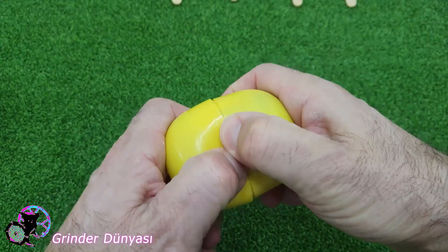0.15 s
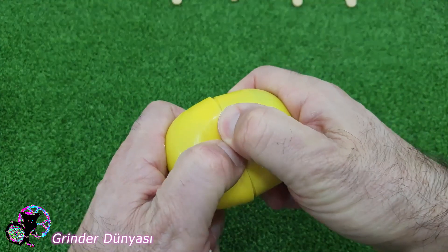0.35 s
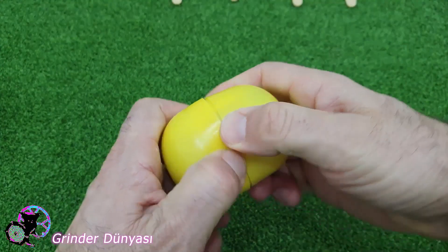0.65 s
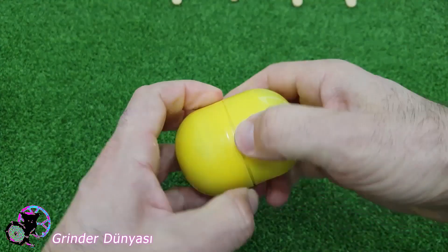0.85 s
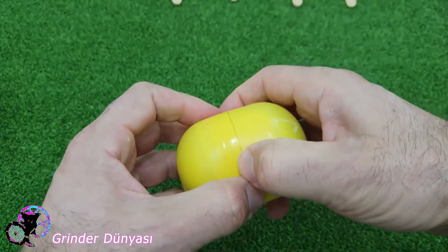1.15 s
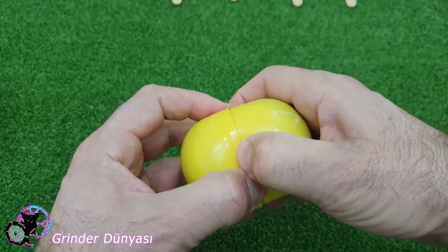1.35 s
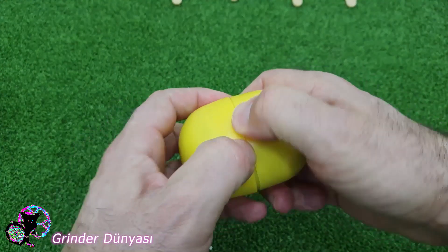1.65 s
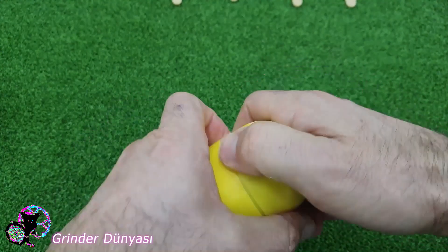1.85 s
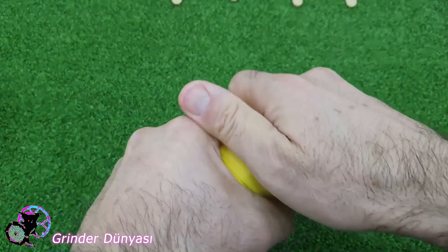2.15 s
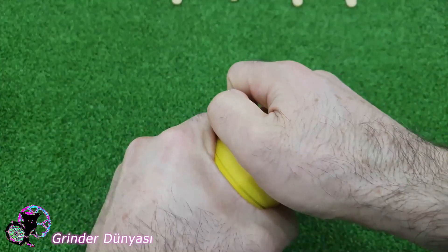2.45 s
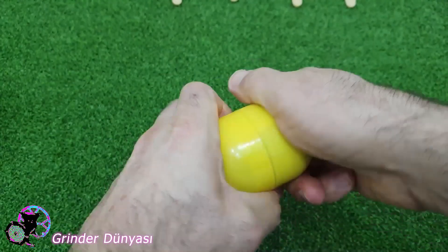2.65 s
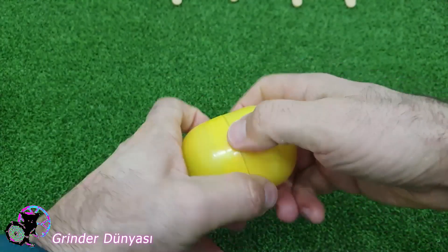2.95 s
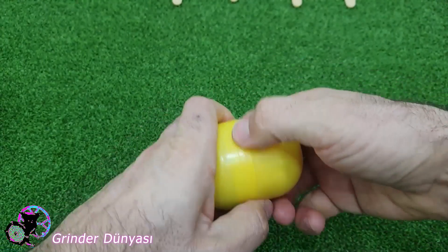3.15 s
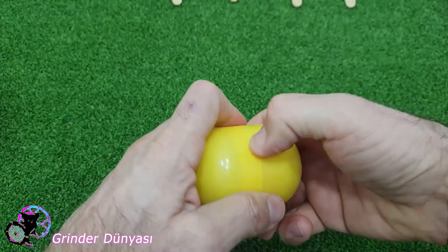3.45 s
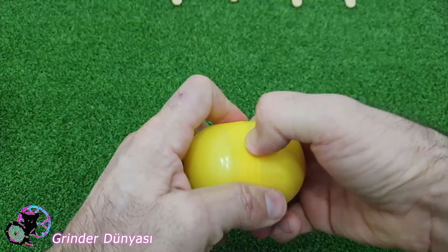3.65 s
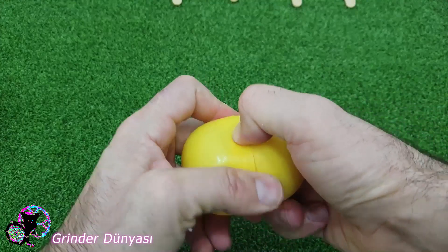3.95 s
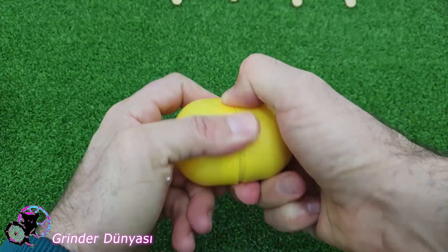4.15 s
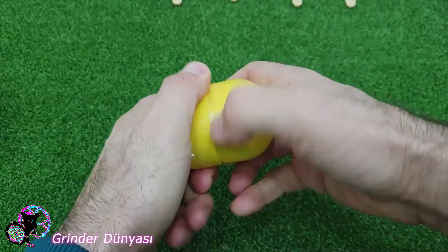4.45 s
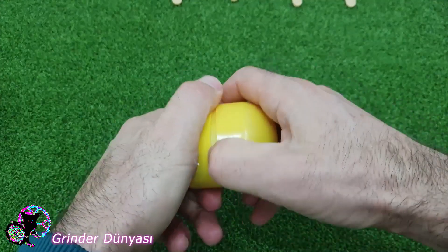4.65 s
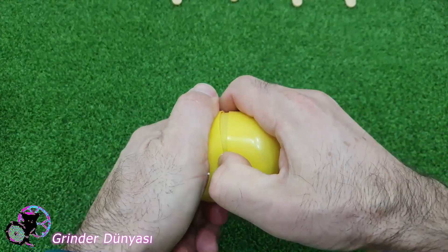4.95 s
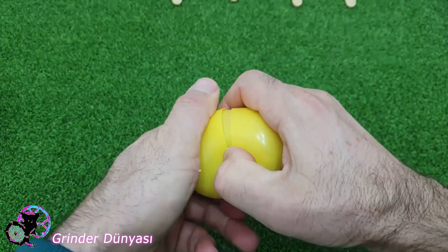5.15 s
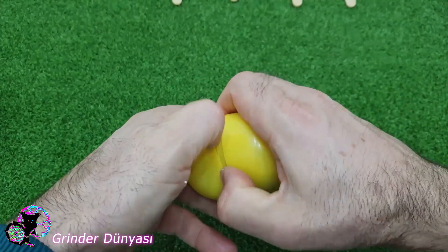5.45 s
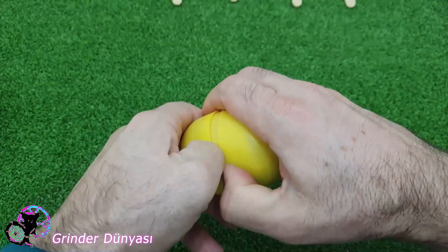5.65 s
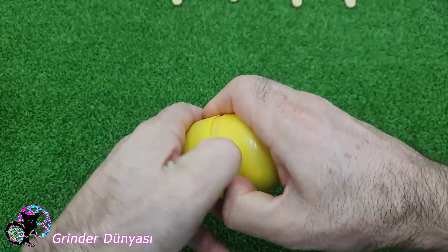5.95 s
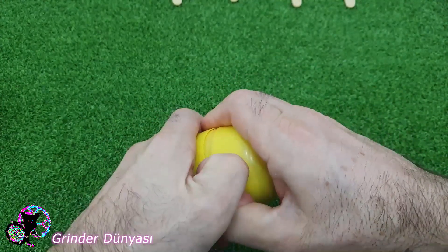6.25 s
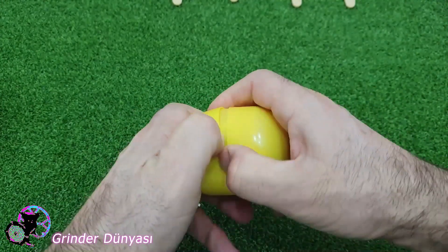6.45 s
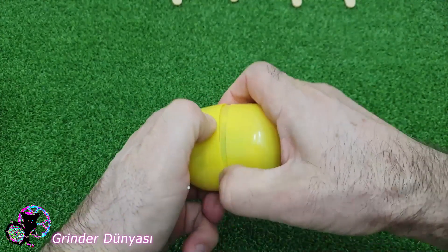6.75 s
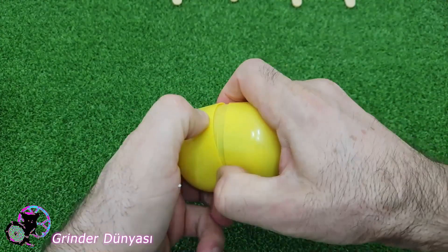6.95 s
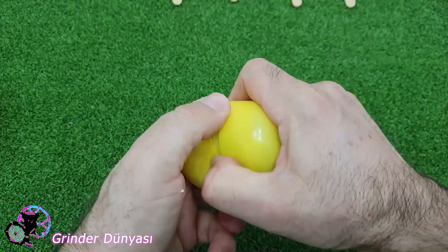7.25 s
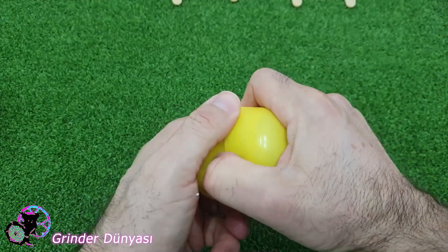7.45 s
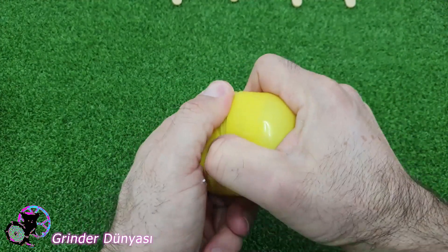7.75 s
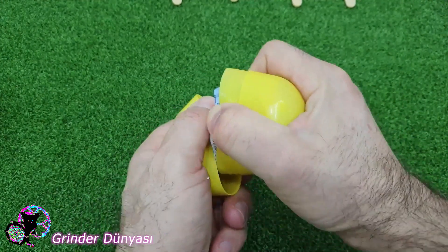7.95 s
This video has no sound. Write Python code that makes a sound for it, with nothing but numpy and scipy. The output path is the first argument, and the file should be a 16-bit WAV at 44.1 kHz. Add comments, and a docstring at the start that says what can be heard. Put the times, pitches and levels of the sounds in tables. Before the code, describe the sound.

Close to two hands in a hard-walled room, skin rubs and squeaks on a hollow plastic capsule while its seam ticks. After a few seconds of fading handling, a single huge pop overloads the microphone and echoes briefly. Quiet fumbling follows, then a crack with a rough rim scrape, a lull, firmer rubbing, and a snapping slide as the halves part.

```python
"""A hard-walled room, heard close to two hands that squeeze and twist a hollow plastic toy capsule.
Skin rubs on the shell as fluttering noise through the wall and the hollow between the hands; cracks and ticks
of rim and seam are bursts into resonances; one loud pop drives the wall's modes and the room; the rim scrapes
over its ridge, husky notes glide, soft thuds are decaying sines, and at last the halves slip apart.
A quiet room tone lies beneath. The loudest cracks overload the microphone."""
import sys
import numpy as np
from scipy import signal
from scipy.fft import rfft, irfft, next_fast_len
from scipy.io import wavfile
from scipy.ndimage import map_coordinates

SR = 44100
rng = np.random.default_rng(int(sys.argv[2]) if len(sys.argv) > 2 else 0)


def transcribe(signal):
    """Save signal, clipped to [-1, 1], as a 16-bit WAV file at the path in sys.argv[1]."""
    frames = np.atleast_2d(signal).T
    limited = np.clip(frames, -1, 1)
    pcm = np.round(limited * 32767).astype(np.int16)
    wavfile.write(sys.argv[1], SR, pcm)


N = 356328

# the wall buckling: (time [s], level [dB])
POP = (3.2019, 5.5)
# resonances of the buckling wall: (frequency [Hz], width [Hz], level [dB])
POP_MODES = [(370, 200, -3), (680, 270, -5), (1395, 360, 6.5), (1800, 300, 6), (2600, 700, -2),
             (4100, 2400, -14)]
# colour of the pop as it spreads through the room: (frequency [Hz], level [dB per Hz])
POP_SPREAD = [(50, -23), (100, -11), (180, -5), (330, -2.5), (600, -0.5), (900, -7), (1300, -6), (1700, -6),
              (2400, -11), (4200, -11), (5500, -21.5), (9000, -25), (15000, -26.5)]
# cracks of the rim and seam, loud and faint: (time [s], level [dB], ring [Hz], crack over ring [dB],
# knock over ring [dB], crack centre [Hz], left over right [dB])
CRACKS = [(0.654, -25.5, 3130, 0.5, -15.5, 2340, 1), (0.8097, -13.5, 676, -5, -2, 3100, 1),
          (4.4964, -43.5, 7700, 12.5, -14, 5150, -16.5), (4.87, -30, 1780, -0.5, -5.5, 4400, -2.5),
          (4.8867, -24.5, 6430, -2.5, -10, 3930, -1), (4.982, -34, 1890, 1.5, 1.5, 3420, -1),
          (5.5847, -16.5, 1730, 4.5, -13, 3700, -2), (5.5944, -29, 1470, -4, 0.5, 3760, 0),
          (5.6209, -13.5, 1843, 9, -6, 6000, -2.5), (7.9042, -16.5, 640, -0.5, -28, 3640, 0),
          (7.9115, -6.5, 1700, -1, -8, 5200, 0), (8.0383, -27, 1710, 9, -2, 6440, 1)]
# small ticks of the seam: (time [s], level [dB], ring [Hz], crack over ring [dB])
TICKS = [(0.0106, -32.5, 2690, -8), (0.2127, -39.5, 1700, 2), (0.2253, -31, 1800, -2),
         (0.24, -32.5, 1640, -0.5), (0.3427, -32.5, 1660, -1), (0.6785, -29.5, 1500, -2),
         (0.7999, -24, 1040, -1), (0.8373, -23.5, 646, -7), (1.3383, -33.5, 6800, 3),
         (1.564, -39, 1630, -9), (1.576, -38.5, 3520, 1), (1.9224, -44.5, 890, 3),
         (2.5234, -41.5, 1950, -8), (2.8744, -41, 2600, 1), (3.0722, -37, 1650, -10),
         (3.0817, -39, 5070, 6.5), (3.1007, -33, 2370, -2), (3.1705, -38.5, 650, -2.5),
         (3.2002, -19, 695, -13), (3.7232, -45.5, 2270, 3), (3.7342, -39.5, 1870, -4.5),
         (3.93, -37, 1930, -1), (4.0243, -39.5, 2050, 1.5), (4.0373, -40.5, 2170, -1),
         (4.1268, -45.5, 4450, 7), (4.137, -41.5, 2040, 0), (4.1578, -43, 2070, -2),
         (4.226, -49, 2100, 7.5), (4.403, -41.5, 6600, 2), (4.5973, -41, 700, -3),
         (4.8562, -31.5, 1830, -4.5), (5.2787, -40, 7800, 0), (5.841, -46, 4350, 15),
         (6.1054, -45, 1904, -5.5), (7.7555, -48.5, 1680, -7), (7.8835, -37, 1640, -1),
         (7.9197, -17.5, 800, -16), (7.9744, -20, 720, -0.5)]
# hollow knock over ring [dB], centre of the crack [Hz], left over right [dB]
TICK_KNOCK_DB, TICK_CRACK_HZ, TICK_PAN_DB = -11, 3600, -1.6
# resonances of the closed capsule: (frequency [Hz], width [Hz], level [dB])
CAPSULE_MODES = [(343, 92, -5.5), (620, 50, -3.5), (800, 170, -1.5)]
# the palms gripping and turning the shell: (start [s], rise [s], fade [s], level [dB],
# hand cavity [Hz], wall over cavity [dB])
RUBS = [(0.0, 0.015, .1, -33.5, 853, 4), (0.2, .03, .14, -50, 800, 6), (0.32, .03, 0.18, -53.5, 449, 0),
        (0.65, 0.026, .16, -40.5, 830, 1.5), (0.79, .022, .22, -26.5, 470, -5.5),
        (1.02, .13, 0.34, -29, 545, 0.5), (1.54, .055, .15, -43, 650, 9.5),
        (1.66, .06, .12, -47.5, 340, 8.5), (1.72, .07, .15, -42.5, 320, -9),
        (1.87, .05, .3, -47, 340, -3.5), (2.08, .14, .4, -51.5, 350, -3), (2.38, .06, .45, -49.5, 340, -1),
        (2.75, .04, .38, -48, 485, 4), (3.07, .035, .17, -36, 600, -5.5), (3.71, .02, .2, -61, 430, 13),
        (4.0, .03, .15, -65, 490, 16.5), (4.11, .03, .12, -62.5, 620, 17.5),
        (4.2, .04, .3, -58.5, 297.8, 4), (4.29, 0.094, .55, -53, 730, 3),
        (4.845, .045, 0.088, -35, 699.4, 0.5), (4.97, .02, 0.11, -42.5, 640, -5),
        (5.262, .035, .12, -37.5, 330, -9), (5.33, .025, 0.13, -37.5, 310, -11.5),
        (5.48, .04, .1, -56, 317, 7), (6.079, .035, 0.12, -63, 610, 14), (6.72, 0.045, .7, -56.5, 331, -11),
        (7.236, 0.035, 0.19, -30.5, 565, -4.5), (7.27, .05, .18, -33.5, 534, -4),
        (7.42, .05, .08, -45.5, 430, 1.5), (7.72, .02, .15, -53.5, 490, -7.5),
        (7.891, 0.023, 0.23, -27, 520, 1)]
RUB_SKIN_DB = -8.5  # skin hiss under the sound of the wall
# fingertips sliding lightly over the shell: (start [s], rise [s], fade [s], level [dB])
BRUSHES = [(0.36, .06, .15, -52), (0.49, .045, .15, -45), (0.56, 0.045, .12, -41), (0.69, .09, .12, -36.5),
           (1.008, 0.066, .24, -23), (1.42, 0.063, 0.13, -46), (1.66, .07, 0.2, -42.5),
           (1.84, 0.06, 0.42, -44), (2.08, 0.11, 0.25, -44.5), (2.35, 0.062, 0.38, -49.5),
           (2.56, .05, .45, -41.5), (2.8, .08, .2, -46.5), (2.95, .07, .15, -51), (3.42, .07, .18, -46.5),
           (4.19, 0.067, .25, -47), (4.28, 0.092, .25, -46.5), (4.451, 0.049, 0.34, -44),
           (4.721, .06, .2, -52.5), (5.2, 0.098, 0.13, -41), (5.39, 0.098, 0.35, -48.5),
           (6.061, 0.07, 0.078, -46), (6.34, .06, 0.39, -54.5), (6.75, 0.14, .22, -55.5),
           (7.0, 0.064, 0.095, -51.5), (7.13, 0.075, 0.23, -45), (7.21, .055, .09, -34.5),
           (7.32, .09, 0.14, -42)]
BRUSH_CAVITY_DB, BRUSH_WALL_DB = -16.5, -10  # hand cavity and wall against the hiss
# depth of a stroke's rise and fade [dB], and how they bend (1 = straight in dB)
SWING_DB, RISE_SHAPE, FADE_SHAPE = 20.5, 2, 1
# hands that merely hold still rustle: cavity pitch [Hz], then levels of cavity, wall and skin [dB]
HOLD_HZ, HOLD_CAVITY_DB, HOLD_WALL_DB, HOLD_SKIN_DB = 340, -69, -73.5, -63
# colour of the rubbed wall: (frequency [Hz], level [dB per Hz])
WALL_COLOUR = [(600, -31.5), (1100, -4.5), (1400, -4.5), (1850, -2), (2500, -4), (3300, -5.5), (4500, -6.5),
               (7000, -21.5)]
# colour of the skin's hiss: (frequency [Hz], level [dB per Hz])
SKIN_COLOUR = [(2500, -23), (5000, -2), (7000, -1), (10000, -4.5), (13000, -2), (16000, -9.5)]
# the rim dragged over its ridge: (time [s], level [dB])
RIM_SLIDE = [(5.541, -40.5), (5.575, -32), (5.615, -36), (5.635, -13), (5.70, -18.5), (5.74, -25),
             (5.80, -33.5), (5.90, -48)]
# colour of the dragged rim: (frequency [Hz], level [dB per Hz])
RIM_COLOUR = [(60, -14.5), (150, -5), (260, -14.5), (800, -1), (1200, -4.5), (1900, 1), (2800, 1.5),
              (5000, -3.5), (8000, -9), (12000, -7.5), (16000, -13)]
# the halves sliding apart: (time [s], level [dB])
PARTING = [(7.87, -70), (7.897, -39), (7.91, -10.5), (7.945, -24.5), (7.975, -14.5), (8.0, -30.5),
           (8.04, -24), (8.08, -42)]
# the opened half ringing like a cup: (frequency [Hz], width [Hz], level [dB])
CUP_MODES = [(610, 61, -5.5), (775, 36, 1.5), (1710, 52, -14.5), (1930, 65, -11)]
# husky gliding notes, squeaks of skin on plastic and low hums of the cupped hands:
# (start [s], end [s], start pitch [Hz], end pitch [Hz], level [dB])
HUSKY_NOTES = [(0.568, 0.665, 1328, 1086, -41.5), (0.67, 0.789, 909, 570, -48),
               (1.739, 1.862, 312.6, 330, -43), (2.21, 2.541, 340, 351.5, -56.5),
               (2.761, 2.931, 3080, 3330, -53), (4.329, 4.678, 800, 680, -59),
               (6.737, 7.156, 340, 316.2, -59), (7.233, 7.398, 661, 636, -36.5),
               (7.24, 7.468, 419, 456.4, -37)]
# the seam sticking and slipping: (start [s], end [s], rate [slips per s], ring [Hz],
# first level [dB], last level [dB])
CREAKS = [(2.251, 2.605, 130, 2090, -60.5, -56), (3.948, 4.08, 62, 2200, -50, -48),
          (6.106, 6.168, 130, 1290, -47, -59.5), (6.849, 6.92, 45, 1800, -54.5, -63),
          (7.824, 7.9, 150, 1700, -52, -51.5)]
# low, soft thuds of the handled capsule, finger bumps and puffs of air:
# (time [s], level [dB], pitch [Hz], t60 [s])
THUDS = [(3.201, -23.5, 64.85, 0.28), (5.298, -42, 115, 0.3), (5.626, -15.5, 72, 0.098),
         (7.912, -28.5, 75, 0.15)]
# decay of the room's dense tail: (frequency [Hz], t60 [s])
ROOM_DECAY = [(100, 0.95), (300, 0.69), (1000, 0.53), (3000, 0.53), (6000, 0.48), (14000, 0.3)]
# standing waves between the walls: (frequency [Hz], level [dB], t60 [s])
ROOM_MODES = [(127, -5.5, 1), (163, -7, 1), (227, 2, 0.62), (296.6, -2, 1), (343, 3, 0.73),
              (433, -9.5, 0.25), (466, -1.5, 0.41), (505, -11.5, .7), (623.5, -1.5, 0.65)]
# colour of the room tone: (frequency [Hz], level [dB per Hz])
ROOM_TONE = [(15, -73), (25, -37), (49, -11.5), (76, -5.5), (99, -5.5), (113, -6.5), (404, -34),
             (450, -36.5), (815, -29.5), (884, -29), (3410, -37.5), (7260, -31), (15900, -28)]
# how alike noise is at the left and right ports: (frequency [Hz], likeness [0 to 1])
ALIKE = [(60, 0.6), (250, 0.57), (600, 0.45), (1500, 0.43), (4000, 0), (12000, 0)]
LEAD_S = 0.00005  # the left port hears the hands this much earlier
BLOW_SECONDS = .006  # length of the reference blow that sets the energy of short sounds
TOP_HZ = 15850  # upper band limit


def pop():
    """The wall flips through and drives all its broad resonances at once, then the whole room."""
    near, far = np.zeros((2, N)), np.zeros((2, N))
    t = np.arange(SR // 10) / SR
    force = release(t, t60=0.0051, rough=0.28)
    # the flip takes a moment, which softens the top of the bang
    bang = filtered(body(force, POP_MODES), lambda f: 1 / (1 + 1j * f / 4500))
    s, db = POP
    add(near, s, amp(db) * (unit_blow(bang) + amp(-30.5) * unit_blow(force)))
    add(far, s, amp(db + 11.0) * unit_blow(1. * (t == 0)))
    return near + panned(room(far, POP_SPREAD), -2.7)


def cracks():
    """Rim and seam crack, loud and faint, each time with their own crack pitch and knock."""
    out = np.zeros((2, N))
    for s, db, ring_hz, crack_db, knock_db, crack_hz, pan_db in CRACKS:
        add(out, s, panned(click(db, ring_hz, crack_db, knock_db, crack_hz), pan_db))
    return out


def ticks():
    """Small slips of the seam differ in ring but share one knock balance and one crack pitch."""
    out = np.zeros((2, N))
    for s, db, ring_hz, crack_db in TICKS:
        tick = click(db, ring_hz, crack_db, TICK_KNOCK_DB, TICK_CRACK_HZ)
        add(out, s, panned(tick, TICK_PAN_DB))
    return out


def click(db, ring_hz, crack_db, knock_db, crack_hz):
    """One slip cracks, rings a patch of wall and knocks the hollow inside."""
    t = np.arange(SR // 10) / SR
    ring_force = release(t, t60=0.011, rough=0.68)
    ring = filtered(ring_force, lambda f: resonance(f, ring_hz, 330 + 0.087 * ring_hz) ** 2)
    hollow = body(release(t, t60=0.004, rough=0.46), CAPSULE_MODES)
    knock = filtered(hollow, lambda f: resonance(f, 520, 1100))
    crack_force = release(t, t60=0.023, rough=1.7)
    crack = filtered(crack_force,
                     lambda f: resonance(f, crack_hz, 1.8 * crack_hz) * resonance(f, 4000, 23000))
    mix = unit_blow(ring) + amp(knock_db) * unit_blow(knock) + amp(crack_db) * unit_blow(crack)
    return amp(db) * mix


def release(t, t60, rough):
    """A sudden release of stress: one push and a brief chatter behind it."""
    push = unit_blow(1. * (t == 0))
    chatter = unit_blow(stereo_noise(len(t)) * amp(-60 * t / t60))
    return push + rough * chatter


def rubbing():
    """Skin hisses on the shell, shakes its wall and sounds the changing hollow between the hands."""
    rub = friction(slips_per_s=340, slip_share=0.72, spread_db=3, flutter_db=1)
    f, frames, z = signal.stft(rub, SR, nperseg=512)
    f = f[:, None]
    centre, gains = hands(frames)
    cavity_gain, wall_gain, skin_gain = [np.interp(np.arange(N) / SR, frames, g) for g in gains]
    # the cavity moves in pitch but keeps an even strength in every frame
    hollow = abs(resonance(f, centre, 0.82 * centre) * resonance(f, 310, 1100))
    hollow = hollow / np.linalg.norm(hollow, axis=0)
    cavity = unit(signal.istft(z * hollow, SR, nperseg=512)[1][:, :N])
    # the soft flesh adds a dull rumble under the cavity
    flesh = unit(filtered(stereo_noise(N), lambda f: resonance(f, 140, 200) ** 2))
    wall = coloured(friction(slips_per_s=200, slip_share=0.54, spread_db=4.5, flutter_db=2.0), WALL_COLOUR)
    skin = coloured(friction(slips_per_s=560, slip_share=0.087, spread_db=3, flutter_db=2.17), SKIN_COLOUR)
    mix = cavity_gain * (cavity + amp(-16.0) * flesh) + wall_gain * wall + skin_gain * skin
    # the right port is a little more sensitive
    return panned(mix, -1.2)


def hands(t):
    """Cavity pitch and gains of cavity, wall and skin: brushes mostly hiss, firm rubs sound the hollow."""
    brush = sum(amp(db) ** 2 * swell(t, start, rise, fade) for start, rise, fade, db in BRUSHES)
    cavity = amp(HOLD_CAVITY_DB) ** 2 + amp(BRUSH_CAVITY_DB) ** 2 * brush
    wall = amp(HOLD_WALL_DB) ** 2 + amp(BRUSH_WALL_DB) ** 2 * brush
    skin = amp(HOLD_SKIN_DB) ** 2 + brush
    # stronger movements pull the pitch harder: a mean weighted by cavity power
    weighted_hz = HOLD_HZ * cavity
    for start, rise, fade, db, hz, wall_db in RUBS:
        power = amp(db) ** 2 * swell(t, start, rise, fade)
        cavity = cavity + power
        weighted_hz = weighted_hz + hz * power
        wall = wall + amp(wall_db) ** 2 * power
        skin = skin + amp(wall_db + RUB_SKIN_DB) ** 2 * power
    return weighted_hz / cavity, np.sqrt([cavity, wall, skin])


def swell(t, start, rise, fade):
    """Power of one hand stroke: it gathers speed, peaks and runs out."""
    past = t - start - rise  # time past the peak
    rising = np.maximum(-past / rise, 0) ** RISE_SHAPE
    fading = np.maximum(past / fade, 0) ** FADE_SHAPE
    return amp(-SWING_DB * (rising + fading)) ** 2


def friction(slips_per_s, slip_share, spread_db, flutter_db):
    """Rubbing force: smooth shear plus tiny slips of uneven size, under a fluttering pressure."""
    sizes = amp(spread_db * np.clip(rng.standard_normal(N), -2, 2))
    slips = (rng.random(N) < slips_per_s / SR) * sizes
    shear = stereo_noise(N)
    pressure = amp(flutter_db * wobble(70))
    return (shear + slip_share * unit(slips * stereo_noise(N))) * pressure


def rim_slide():
    """The rim chatters over its ridge as rough friction, shaped in level and colour."""
    scrape = friction(slips_per_s=1400, slip_share=0.67, spread_db=1.5, flutter_db=2.5)
    return stroke(RIM_SLIDE) * coloured(scrape, RIM_COLOUR)


def parting():
    """The rims scrape past each other and sound the open cup."""
    scrape = friction(slips_per_s=420, slip_share=0.71, spread_db=1.5, flutter_db=2.0)
    cup = filtered(body(scrape, CUP_MODES), lambda f: resonance(f, 1300, 1600))
    return stroke(PARTING) * unit(cup)


def stroke(rows):
    """Gain of one movement from its (time [s], level [dB]) rows."""
    return amp(np.interp(np.arange(N) / SR, *np.transpose(rows), left=-120, right=-120))


def husky_notes():
    """Squeaks of skin on plastic and low hums of the cupped hands: narrow, unsteady bands that glide."""
    out = np.zeros((2, N))
    for start, end, start_hz, end_hz, db in HUSKY_NOTES:
        n = max(round((end - start) * SR), 256)
        phase = 2 * np.pi * np.cumsum(np.linspace(start_hz, end_hz, n)) / SR
        # slow noise on sine and cosine makes the note husky
        unsteady = filtered(rng.standard_normal((2, n)), lambda f: 1 / (1 + (f / (.08 * start_hz)) ** 2))
        note = unit(unsteady[0] * np.sin(phase) + unsteady[1] * np.cos(phase))
        add(out, start, amp(db) * signal.windows.tukey(n, .5) * note)
    return panned(out, -1.5)


def creaks():
    """The seam sticks and slips: runs of tiny slips at an uneven rate ring one patch of the wall."""
    out = np.zeros((2, N))
    t = np.arange(SR // 20) / SR
    for start, end, rate, hz, first_db, last_db in CREAKS:
        for s in np.arange(start, end, 1 / rate):
            db = np.interp(s, [start, end], [first_db, last_db]) + rng.normal(0, 2.9)
            force = release(t, t60=0.013, rough=.5)
            slip = filtered(force, lambda f: resonance(f, hz, .33 * hz) ** 2)
            add(out, s + rng.normal(0, 0.3) / rate, amp(db) * unit_blow(slip))
    return panned(out, -2)


def thuds():
    """Finger bumps and puffs of air give low, soft thuds: decaying sines with a rounded start."""
    out = np.zeros((2, N))
    t = np.arange(SR // 2) / SR
    for s, db, hz, t60 in THUDS:
        onset = 1 - np.exp(-t / 0.0058)
        add(out, s, amp(db - 60 * t / t60) * onset * np.sin(2 * np.pi * hz * t))
    return panned(out, -12.0)


def ports(x):
    """The hands work a little nearer to the left port, so the sound reaches it first."""
    return filtered(x, lambda f: np.exp(1j * np.pi * LEAD_S * np.array([f, -f])))


def room(x, colour):
    """The walls answer in a dense tail whose treble dies first, with a few standing waves."""
    f, frames, z = signal.stft(stereo_noise(SR), SR, nperseg=256)
    decay = amp(-60 * frames / along(ROOM_DECAY, f)[:, None])
    tail = signal.istft(z * decay, SR, nperseg=256)[1]
    t = np.arange(tail.shape[1]) / SR
    waves = sum(amp(db - 60 * t / t60) * np.sin(2 * np.pi * (hz * t + rng.random()))
                for hz, db, t60 in ROOM_MODES)
    tail = tail / np.linalg.norm(tail[0]) + amp(-17.5) * waves / np.linalg.norm(waves)
    tail = tail * (1 - np.exp(-(t / 0.0041) ** 2))  # the answer builds up over a few milliseconds
    answer = filtered(tail, lambda f: amp(along(colour, f)))
    return signal.fftconvolve(x, answer, axes=1)[:, :N]


def room_tone():
    """The quiet tone of the room: steady coloured noise, stronger on the right."""
    return amp(-58.0) * panned(coloured(stereo_noise(N), ROOM_TONE), -7)


def amp(db):
    """Decibels to gain."""
    return 10 ** (np.asarray(db) / 20)


def unit(x):
    """x at rms 1."""
    return x / np.sqrt(np.mean(x ** 2) + 1e-20)


def unit_blow(x):
    """A short sound scaled to the energy of one reference blow at rms 1."""
    energy = np.mean(np.sum(x ** 2, axis=-1))
    return x * np.sqrt(BLOW_SECONDS * SR / energy)


def along(points, hz):
    """(frequency [Hz], value) points read on a log frequency axis."""
    f, v = np.transpose(points)
    return np.interp(np.log(hz + 1), np.log(f + 1), v)


def wobble(rate):
    """A smooth random curve, rate knots a second."""
    knots = rng.standard_normal(int(N * rate / SR) + 4)
    return map_coordinates(knots, [np.arange(N) * rate / SR])


def filtered(x, response):
    """x times a complex response of frequency."""
    n = x.shape[-1]
    m = next_fast_len(n + SR // 10)
    return irfft(rfft(x, m) * response(np.fft.rfftfreq(m, 1 / SR)), m)[..., :n]


def resonance(f, hz, width):
    """Causal response of one damped mode."""
    return 1j * f * width / (hz * hz - f * f + 1j * f * width)


def body(x, modes):
    """x through a set of modes that alternate in polarity."""
    return filtered(x, lambda f: sum((-1) ** k * amp(db) * resonance(f, hz, width)
                                     for k, (hz, width, db) in enumerate(modes)))


def stereo_noise(n):
    """Noise at two ports: alike in the bass, unrelated in the treble."""
    def mid_side(f):
        turn = np.arccos(np.clip(along(ALIKE, f), -1, 1)) / 2
        return np.array([np.cos(turn), np.sin(turn)])

    mid, side = filtered(rng.standard_normal((2, n)), mid_side)
    return np.array([mid + side, mid - side])


def coloured(x, spectrum):
    """x shaped by (frequency [Hz], level [dB]) points, at rms 1."""
    return unit(filtered(x, lambda f: amp(along(spectrum, f))))


def panned(x, db):
    """x with the left side db louder than the right."""
    return x * amp([[db / 2], [-db / 2]])


def add(track, s, sound):
    """Mix a sound into the track at s seconds."""
    part = track[:, round(s * SR):][:, :sound.shape[-1]]
    part += sound[..., :part.shape[-1]]


def gain_control(x, threshold_db, recovery_s):
    """The gain sinks with the recent power of the sound and creeps back."""
    keep = np.exp(-1 / (recovery_s * SR))
    power = signal.lfilter([1 - keep], [1, -keep], np.mean(x ** 2, axis=0))
    return x / np.sqrt(1 + power / amp(threshold_db) ** 2)


def scene():
    """The capsule in the hands, the room's answer and its quiet tone."""
    clicks = cracks() + ticks() + creaks()
    rubs = rubbing() + husky_notes() + rim_slide() + parting()
    click_echo = room(clicks, [(300, -4.5), (800, -6.5), (1700, -7.5), (10000, -4)])  # (Hz, dB)
    rub_echo = room(rubs, [(200, -8.5), (2000, -9.5), (10000, -12.0)])
    return ports(clicks + rubs) + pop() + thuds() + click_echo + rub_echo + room_tone()


def record(dry):
    """The microphone's gain ducks loud moments, clips at full scale and cuts steeply at the band limit."""
    clipped = np.clip(gain_control(dry, threshold_db=-8.0, recovery_s=0.066), -1, 1)
    return filtered(clipped, lambda f: 1 / np.sqrt(1 + (f / TOP_HZ) ** 240))


dry = scene()
out = record(dry)
transcribe(out)
```